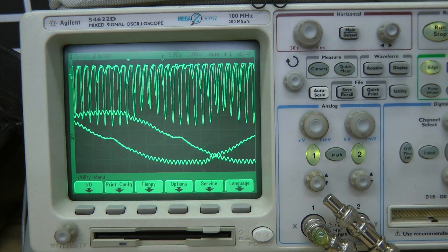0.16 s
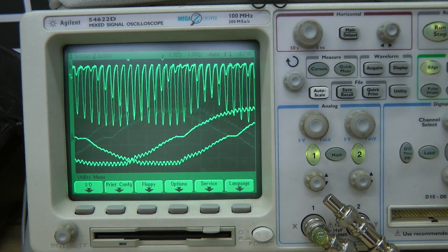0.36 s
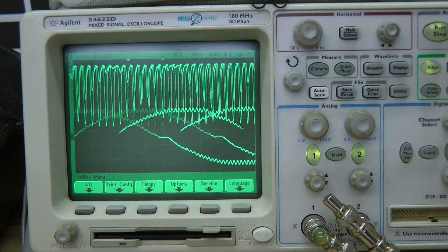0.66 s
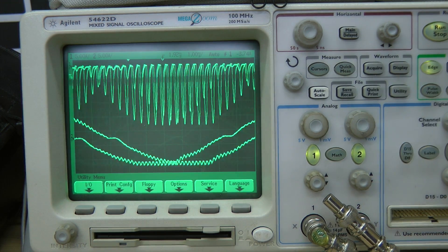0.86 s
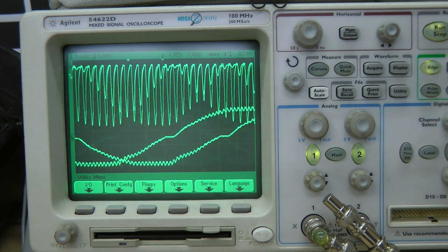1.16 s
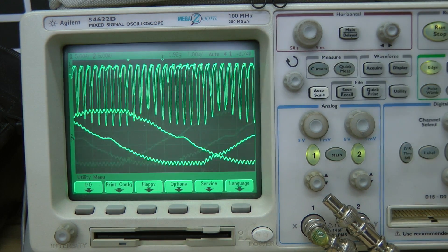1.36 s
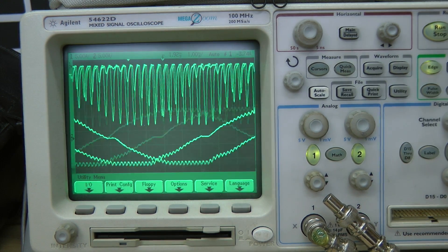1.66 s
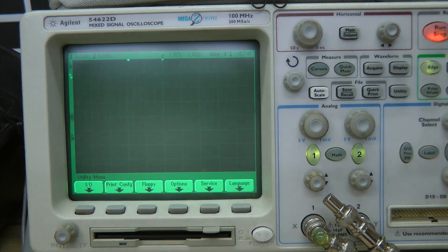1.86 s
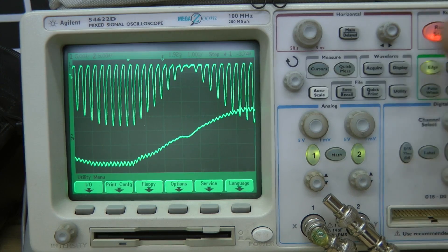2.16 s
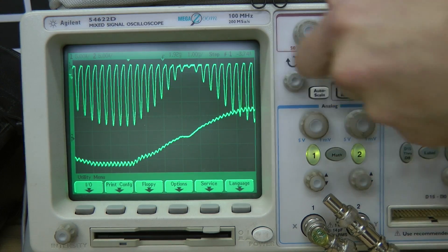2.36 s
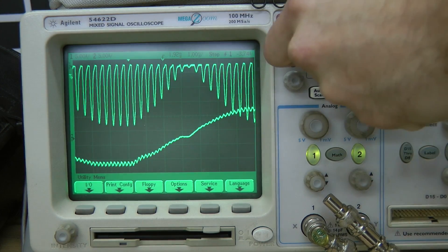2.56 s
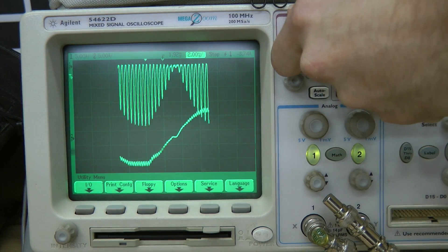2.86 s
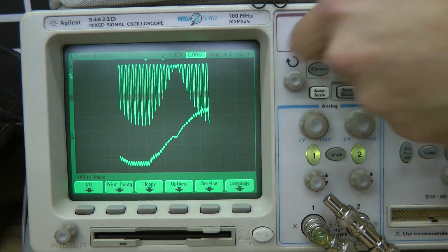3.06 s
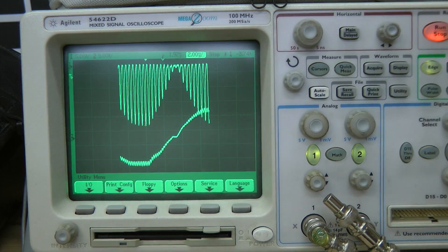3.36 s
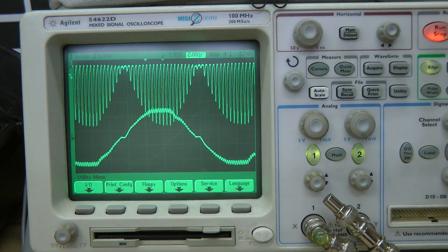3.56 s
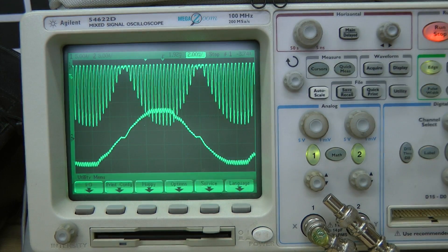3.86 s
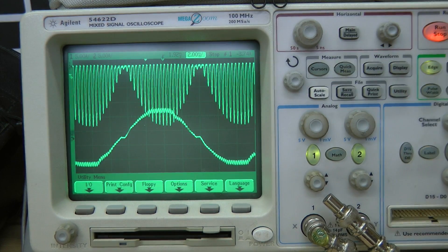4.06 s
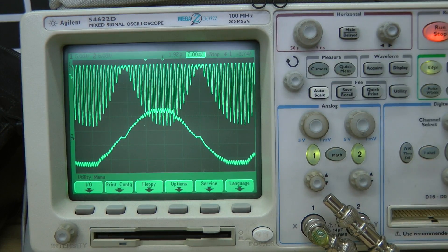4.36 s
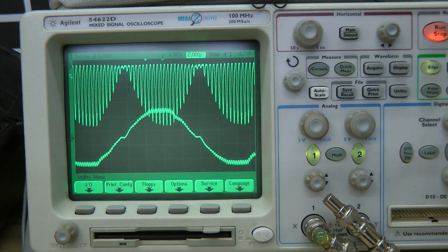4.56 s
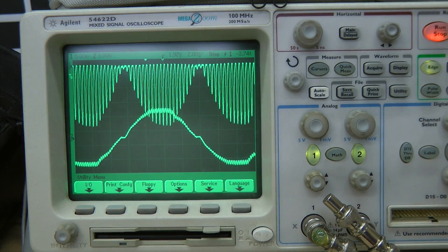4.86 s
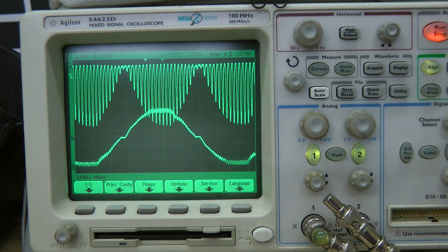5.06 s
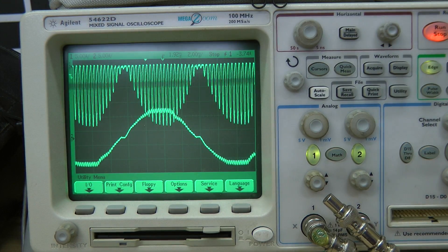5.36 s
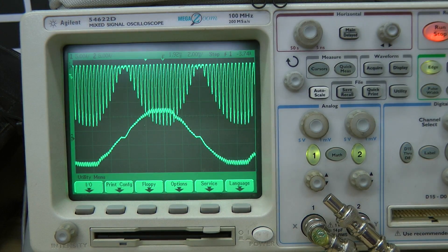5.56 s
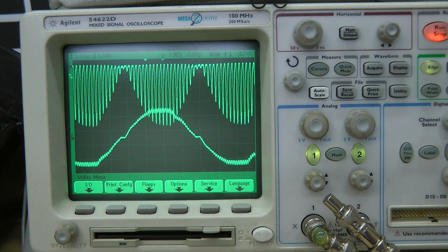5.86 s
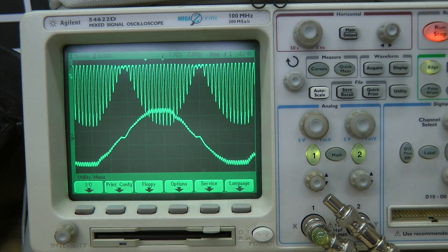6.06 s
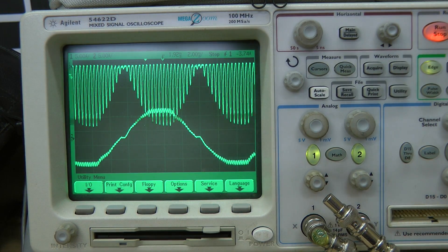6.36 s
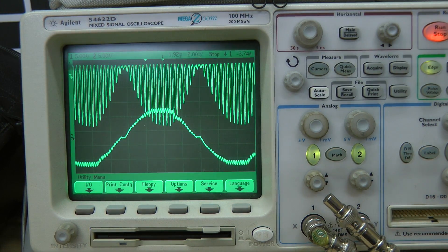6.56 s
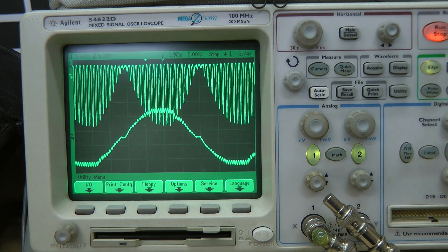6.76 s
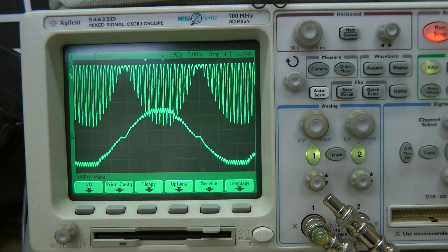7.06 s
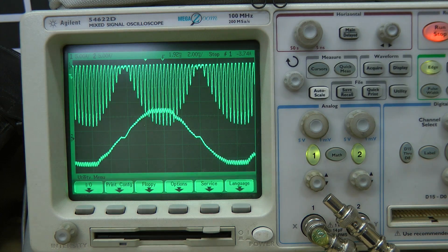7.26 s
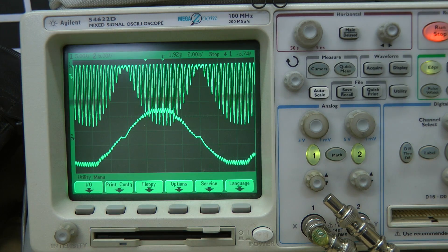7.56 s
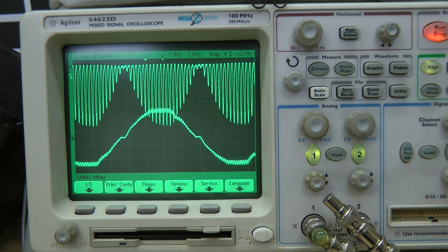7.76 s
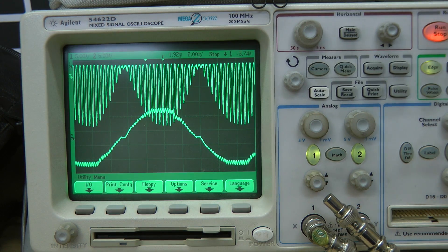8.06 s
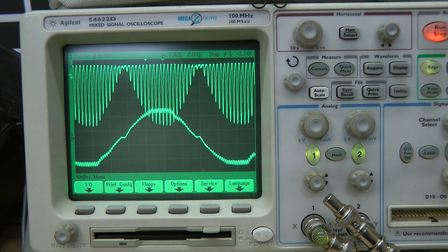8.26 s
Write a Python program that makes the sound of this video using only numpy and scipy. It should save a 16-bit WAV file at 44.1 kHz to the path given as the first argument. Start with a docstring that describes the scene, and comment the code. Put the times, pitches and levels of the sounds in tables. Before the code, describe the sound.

Close on a bench in a small, reflective workshop, a high-speed fan motor finishes its quick run-up and screams steadily, with lower motor tones and a broad, hissing air blast. After a long hold the power is cut. The piercing tone sweeps downward, wavering, and the air fades from bright hiss to a duller, low rush, with one faint dull thump from the bench. The stereo midrange leans right.

```python
"""Hand dryer on a workbench

A high-speed motor, already turning fast, runs up to full speed, holds it, is switched off and coasts down.
Its nine-blade fan whines as tones locked to the shaft; mains ripple shakes the whine while the power is on.
Shaped noise makes the rushing air, and a decaying low sine makes a late bump on the bench.
Reflections in the workshop make the whine flutter whenever its pitch glides."""
import sys
import numpy as np
from scipy import signal
from scipy.fft import rfft, irfft
from scipy.io import wavfile
from scipy.ndimage import uniform_filter1d

SR = 44100
rng = np.random.default_rng(int(sys.argv[2]) if len(sys.argv) > 2 else 0)


def file_out(sig):
    """Save sig as 16-bit WAV at sys.argv[1]."""
    # one column per channel
    cols = np.atleast_2d(sig).T
    # limit, then scale
    lim = np.clip(cols, -1, 1)
    pcm = np.round(lim * 32767).astype(np.int16)
    wavfile.write(sys.argv[1], SR, pcm)


N = 371423
TIME = np.arange(N) / SR  # seconds

BLADE_COUNT = 9
FULL_HZ = 1282.55  # full speed, shaft turns per second
OFF_S = 6.465  # moment of switching off

# strength and brightness of the rushing air as heard, which the drive tones follow:
# (time [s], level [dB], brightness of the air [dB per octave])
AIR_LEVEL = [(0, 2.5, -0.65), (0.18, -0.4, -0.5), (0.32, 2.5, -0.7), (0.8, 0, -0.8), (2.3, 0.97, -1.2),
             (3.4, 2.02, -1.1), (5.85, 2, -0.84), (6.45, 1, -0.55), (6.8, 2.5, 0.5), (7.25, 1.2, -0.6),
             (7.65, 2.6, -1)]


def gain_of(db):
    """Decibels to amplitude."""
    return 10 ** (np.asarray(db) / 20)


def curve(rows, column, t=TIME):
    """One column of a time table, joined by straight lines."""
    rows = np.array(rows)
    return np.interp(t, rows[:, 0], rows[:, column])


def read(rows, hz):
    """All value columns of a spectrum table, joined by straight lines on a log-frequency axis."""
    table_hz, *columns = np.transpose(rows)
    return [np.interp(np.log(hz + 1), np.log(table_hz + 1), column) for column in columns]


def wander(rate_hz):
    """Random drift of size about 1: chance values at the given rate, joined by straight lines."""
    knots = rng.standard_normal(4000)
    return np.interp(TIME * rate_hz, np.arange(len(knots)), knots)


def lift_db(x, centre, width, db):
    """A bell-shaped lift: a resonance over frequency, or a swell over time."""
    return db / (1 + (2 * (x - centre) / width) ** 2)


def shaft_speed(t):
    """Turns per second: pushed up to full speed, held there, then braked by air drag and friction."""
    # a steady push until the knee, where the shaft is lag_hz short of full speed; then it settles
    push_hz_per_s, knee_s, lag_hz, settle_s = 1120, .15, 113, .122
    # air drag takes a share of the speed per turn; bearing friction takes a fixed amount per second
    drag_per_turn, friction_hz_per_s = .002946, 9.15
    settling = lag_hz * np.exp(-np.maximum(t - knee_s, 0) / settle_s)
    lag = settling + push_hz_per_s * np.maximum(knee_s - t, 0)
    even_hz = np.sqrt(friction_hz_per_s / drag_per_turn)  # the speed at which both brake equally
    coasting_s = np.maximum(t - OFF_S, 0)
    braked = np.arctan(even_hz / FULL_HZ) + even_hz * drag_per_turn * coasting_s
    return even_hz / np.tan(braked) - lag


def duct_db(hz):
    """Lift in dB that resonances of the housing, duct and motor frame give to each frequency."""
    # resonances of the housing and duct: (centre [Hz], width [Hz], lift [dB])
    duct_modes = [(398.7, 26, 9), (537, 73, 12), (858, 61, 5.5), (1214, 45, 7.5), (1500, 134, 8),
                  (1749, 100, 10), (2663, 180, 5.5), (4190, 64, 6), (6224, 174, 6), (7420, 300, 2.5),
                  (8917, 310, 2.5)]
    # the resonance in which the motor frame sings: (centre [Hz], width [Hz], lift [dB])
    frame_mode = (5050, 250, 3)
    return sum(lift_db(hz, *mode) for mode in [*duct_modes, frame_mode])


def workshop(wet_db, apart, near_db, t60, near_s=0.0092):
    """Direct sound, quick reflections off the bench and a short tail, much alike at both microphones."""
    t = np.arange(SR // 3) / SR
    shared, left, right, near = rng.standard_normal((4, len(t))) * (t > .001)
    tail = (shared + apart * np.array([left, right])) * gain_of(-60 * t / t60)
    near = near * np.exp(-t / near_s)
    direct = (t == 0)
    response = direct + gain_of(wet_db) * tail / np.linalg.norm(tail[0])
    response = response + gain_of(near_db) * near / np.linalg.norm(near)
    return response / np.linalg.norm(response[0])


def in_room(turns, hz, room, even_s=0.12):
    """A unit tone beats against its own echoes as it glides, less so where it beams; its slow level stays even."""
    # above beam_hz the whine beams straight at the microphones
    beam_hz, gain_per_octave, left_lead_rad = 9200, 3.1, 0.95
    direct = np.exp(2j * np.pi * turns).astype(np.complex64)
    tone = signal.oaconvolve(direct[None], room.astype(np.float32), axes=1)[:, :N]
    beam = gain_per_octave * np.maximum(np.log2(hz / beam_hz), 0)
    tone = tone + beam * direct * np.exp(1j * np.array([[left_lead_rad], [0]]))
    power = uniform_filter1d(abs(tone) ** 2, int(even_s * SR) + 1, axis=1)
    return np.sqrt(2) * tone / np.sqrt(abs(power) + 1e-6)


def blade_tones(hz, powered):
    """(Shaft multiple, gain) of each blade tone as it slides through the outlet's response."""
    # the blade tone and its next three harmonics, before the outlet:
    # (level at full speed [dB], loss per octave of slowing [dB])
    harmonics = [(-29.5, 1), (-47.5, -0.4), (-60.5, 1), (-64, 0)]
    # how well the outlet passes a blade tone: (frequency [Hz], level [dB])
    outlet = [(1400, -22), (1720, -18), (1880, -21), (2130, -7), (3000, -2), (4200, -2.5), (4850, 2),
              (6500, -1.5), (10200, 0.5), (11500, 0), (13500, -2)]
    # slow drift under power: (time [s], level [dB], left minus right [dB])
    slow_drift = [(.5, 0, -3), (.62, -.5, 6.5), (1.05, 2.5, 0.5), (1.8, 2.5, -3), (2.7, 0.5, 1.5),
                  (5.0, 1, 1.3), (6.4, 1.7, 0.5)]
    # swell as the shaft passes one low speed: (turns per second [Hz], width [Hz], lift [dB])
    low_speed_swell = (196, 17, 7.2)
    flutter_db, flutter_hz = 3, 80  # depth once an octave slower, changes per second
    waver_db, waver_hz = 0.56, 14  # slight waver in the air stream: depth, changes per second
    duct_share = 0.23  # how much of the duct's resonances the blade tones take on

    slowing = np.log2(FULL_HZ / hz)  # octaves
    # the whine flutters roughly as it glides down, as if among echoes
    flutter = flutter_db * (1 - powered) * np.minimum(slowing, 1) * wander(flutter_hz)
    half_sides = np.array([[.5], [-.5]])
    drift = powered * (curve(slow_drift, 1) + half_sides * curve(slow_drift, 2))
    shared_db = flutter + drift + waver_db * wander(waver_hz) + lift_db(hz, *low_speed_swell)
    tones = []
    for harmonic, (db, loss_db) in enumerate(harmonics, 1):
        order = harmonic * BLADE_COUNT
        tone_hz = order * hz
        path_db = read(outlet, tone_hz)[0] + duct_share * duct_db(tone_hz)
        tones.append((order, gain_of(db - loss_db * slowing + path_db + shared_db)))
    return tones


def motor(room, jitter=.00007, glide_smear=0.00204, stray=.00008, bearing_db=-62, hum_db=-70,
          waver_db=2.5, waver_hz=45):
    """Tones locked to the shaft: blade whine, unbalance, a bearing and the magnetic pull of the drive."""
    # how loudly the housing answers the rotor's unbalance: (turns per second [Hz], level [dB])
    unbalance = [(150, -80), (200, -58), (238, -51), (270, -74), (350, -67), (430, -47), (480, -60),
                 (520, -40), (565, -37.5), (650, -45), (760, -64), (1000, -64), (1240, -45.5),
                 (1282, -53.5)]
    # the resonance that lifts the bearing tone: (centre [Hz], width [Hz], lift [dB])
    bearing_ring = (1063, 93, 16)
    # tones of the driven motor, before load and speed: (multiple of the shaft speed, level [dB])
    drive_tones = [(2, -55), (3, -54), (4, -42.5), (5, -55), (6, -52), (7, -48.5), (8, -54), (10, -60)]
    # the motor pulls hardest near the end of the run-up: (time [s], width [s], lift [dB])
    hardest_pull = (0.38, .3, 3.4)
    bearing_order = 4.45  # multiple of the shaft speed
    # drive tones: level, rise in dB per octave of speed, share of the air's level changes
    drive_db, drive_rise_db, drive_follow = -2.5, 41, 1.2
    # mains ripple on the blade tone: phase swing, share of level, lag of the level
    ripple_hz, swing_rad, throb_share, throb_lag_rad = 119.9, .54, .31, .7

    hz = shaft_speed(TIME)
    powered = np.clip((OFF_S - TIME) / .01, 0, 1)
    # the whine is clean under power and smeared, as by echoes, while it glides down
    unsteady = (jitter + glide_smear * (1 - powered)) * wander(150) + stray * wander(1)
    turns = np.cumsum(hz * (1 + unsteady)) / SR
    ripple = 2 * np.pi * ripple_hz * TIME

    bearing_lift = lift_db(bearing_order * hz, *bearing_ring)
    bearing = gain_of(bearing_db + bearing_lift + waver_db * wander(waver_hz))
    orders = [(1, gain_of(read(unbalance, hz)[0])), (bearing_order, bearing), *blade_tones(hz, powered)]

    # the drive tones waver with the load and end with the power
    load_db = drive_rise_db * np.log2(hz / FULL_HZ) + lift_db(TIME, *hardest_pull)
    load_db = load_db + drive_follow * curve(AIR_LEVEL, 1)
    effort = powered * gain_of(drive_db + load_db)
    for order, db in drive_tones:
        orders.append((order, effort * gain_of(db + waver_db * wander(waver_hz))))

    # each half cycle of the mains pushes the rotor ahead a little, and it sags back; high tones feel it most
    surge = swing_rad * powered * np.sin(ripple) / BLADE_COUNT
    throb = throb_share * powered * np.cos(ripple - throb_lag_rad) / BLADE_COUNT
    out = np.zeros((2, N))
    for order, gain in orders:
        # fade out before the top of the digital band
        audible = np.clip((SR / 2 - order * hz) / 2000 - 1, 0, 1)
        level = gain * audible * (1 + order * throb)
        tone = in_room(order * turns, order * hz, room) * np.exp(1j * order * surge)
        out += level * tone.real
    hum = gain_of(hum_db) * np.sqrt(2) * powered * np.sin(ripple)
    return out + hum


def air(room, air_db=0, patchy_db=0.94, darkening=0.75):
    """Turbulence rings the duct; as the fan slows its hiss gives way to a low rush."""
    # turbulence before level changes and duct:
    # (frequency [Hz], at full speed [dB per Hz], turning slowly [dB per Hz])
    turbulence = [(35.0, -102, -104), (83, -106.5, -102.5), (153, -96.5, -87), (294, -92, -84.5),
                  (464, -87.5, -81.5), (694, -76.5, -78.5), (1050.0, -84, -81), (1970, -84, -87),
                  (3350, -78.5, -79), (5270, -74, -78.5), (6400, -77.5, -83.5), (12240, -74.5, -92.5),
                  (12500, -81.5, -100), (15700, -82.5, -104)]
    # left-right likeness before the room: (frequency [Hz], likeness [1 = the same])
    likeness = [(40, .1), (130, 0.44), (300, 0.82), (700, 0.63), (1400, 0.3), (3000, 0.9), (7000, 1),
                (11000, 0.39), (15000, 0.71)]
    slow_hz = 190  # turns per second where the air has become a low rush
    # below stall_hz the stream dies away: loss of level and of brightness per octave of slowing
    stall_hz, stall_db, stall_tilt_db = 220, 13.5, 3.5

    t = np.arange(N // 256 + 5) * 256 / SR
    hz = np.fft.rfftfreq(1024, 1 / SR)[:, None]
    a, b, c, d, patches = rng.standard_normal((len(t), len(hz), 5)).T
    # patches of slightly uneven level over frequency and time
    patches = uniform_filter1d(patches, size=14, axis=0)
    patches = uniform_filter1d(patches, size=16, axis=1)

    speed = shaft_speed(t)
    slowed = np.clip(np.log(FULL_HZ / speed) / np.log(FULL_HZ / slow_hz), 0, 1) ** darkening
    fast, slow = read(turbulence, hz)
    db = fast + (slow - fast) * slowed + duct_db(hz) + patchy_db * patches / patches.std()
    stalled = np.maximum(np.log2(stall_hz / speed), 0)
    tilt_db = curve(AIR_LEVEL, 2, t) - stall_tilt_db * stalled
    db += curve(AIR_LEVEL, 1, t) - stall_db * stalled + tilt_db * np.log2((hz + 100) / 2000)

    # the right side shares part of the left side's noise
    same = np.clip(read(likeness, hz)[0], -1, 1)
    left = a + 1j * b
    right = same * left + np.sqrt(1 - same ** 2) * (c + 1j * d)
    spectra = np.sqrt(2) * np.array([left, right]) * gain_of(db + air_db)
    rush = signal.istft(spectra, SR, nperseg=1024, noverlap=768, scaling="psd")[1]
    return signal.oaconvolve(rush[:, :N], room, axes=1)[:, :N]


def bench(rise_s=0.0073):
    """A soft, low bump of the bench top: a sine that rises quickly and dies away."""
    # bumps: (time [s], level [dB], frequency [Hz], time to fall by 60 dB [s])
    bumps = [(7.461, -43, 114, .12)]
    out = np.zeros(N)
    for start_s, db, hz, t60 in bumps:
        t = np.maximum(TIME - start_s, 0)
        envelope = gain_of(db - 60 * t / t60) * (1 - np.exp(-t / rise_s))
        out += envelope * np.sin(2 * np.pi * hz * t)
    return out


def scene():
    """The whine arrives partly off the walls, the air mostly direct; the middle range leans to the right."""
    # stereo balance: (frequency [Hz], left minus right [dB])
    balance = [(60, -0.5), (110, 1.5), (200, -0.5), (380, -3.5), (700, -7), (1290, -6), (2380, -5),
               (4400, 0), (8120, -1.5), (15000, 0.5)]
    whine = motor(workshop(wet_db=-1, apart=.4, near_db=-10, t60=.27))
    rush = air(workshop(wet_db=-12, apart=.3, near_db=-26, t60=.27))
    lean_db = read(balance, np.fft.rfftfreq(N, 1 / SR))[0]
    sides = gain_of(np.array([lean_db, -lean_db]) / 2)
    sides /= np.sqrt((sides ** 2).mean(0))  # keep the power of both sides together
    return irfft(rfft(whine + rush + bench()) * sides, N)


def record(dry, low_cut_hz=62, edge_hz=15750):
    """The microphone's low cut, then the recorder's band limit."""
    low_cut = signal.butter(N=2, Wn=low_cut_hz, btype="high", fs=SR, output="sos")
    thinned = signal.sosfilt(low_cut, dry)
    band_limit = signal.firwin(1023, edge_hz, window=("kaiser", 9), fs=SR)
    return signal.oaconvolve(thinned, band_limit[None], "same")


dry = scene()
out = record(dry)
file_out(out)
```